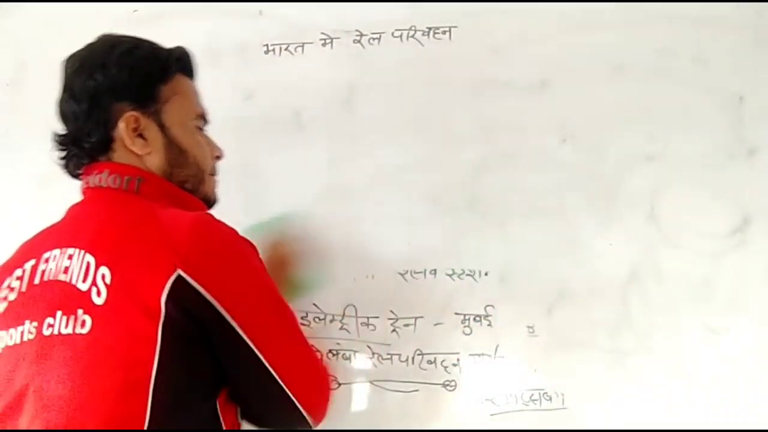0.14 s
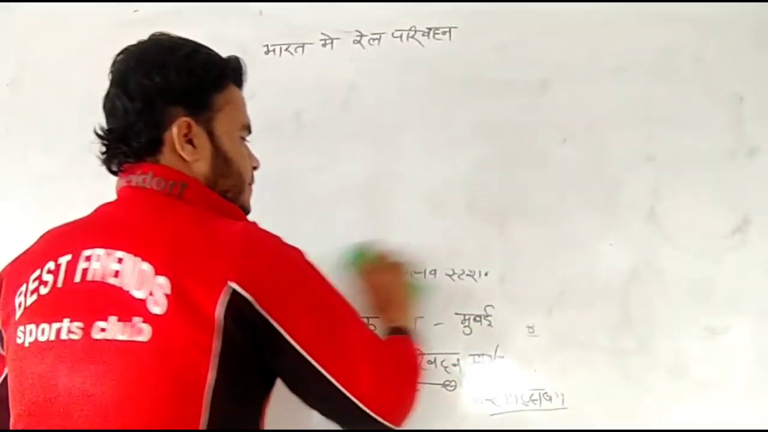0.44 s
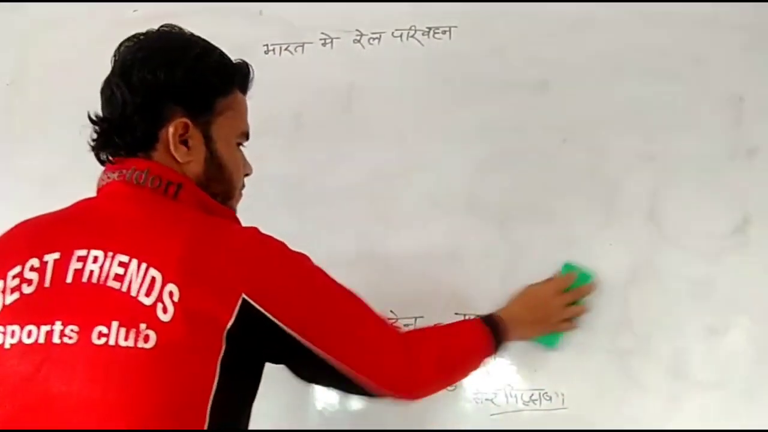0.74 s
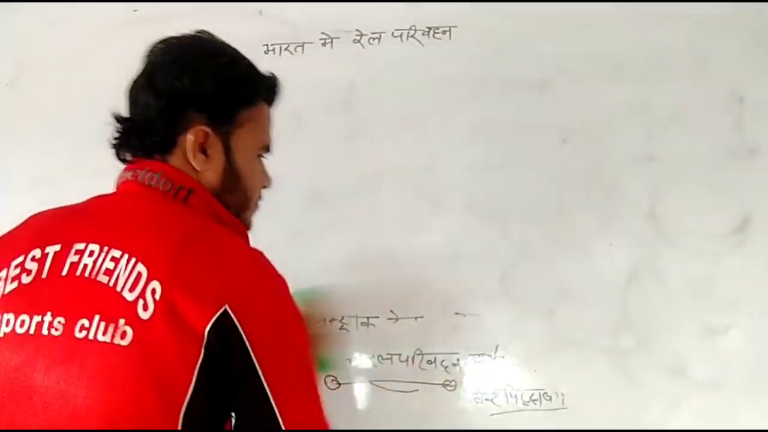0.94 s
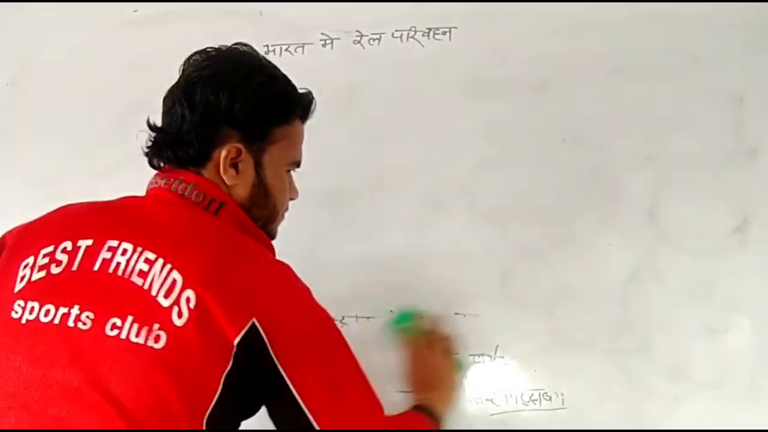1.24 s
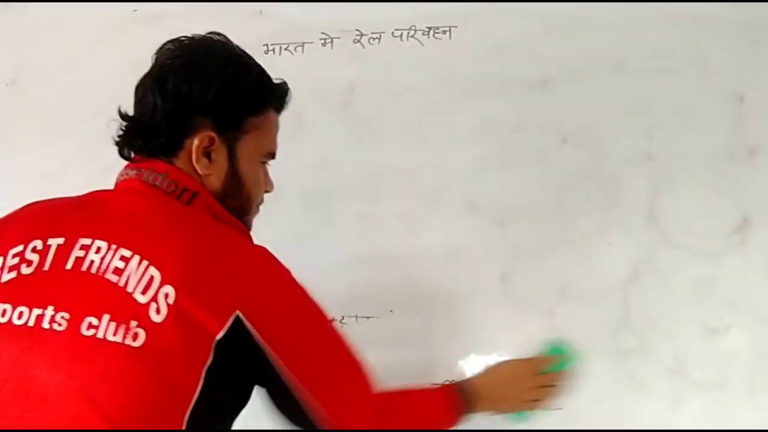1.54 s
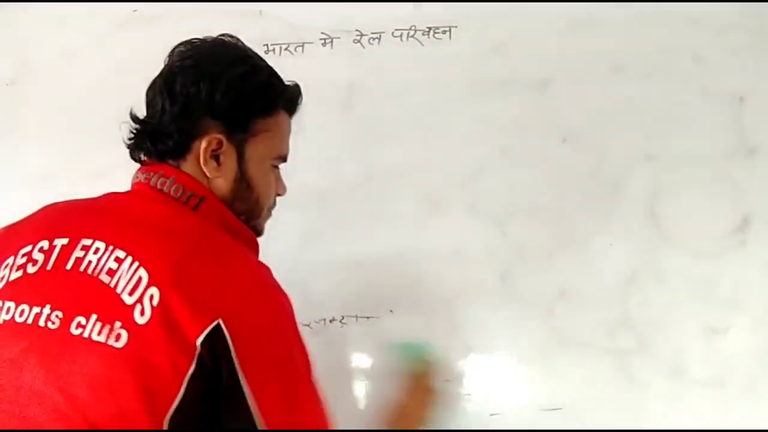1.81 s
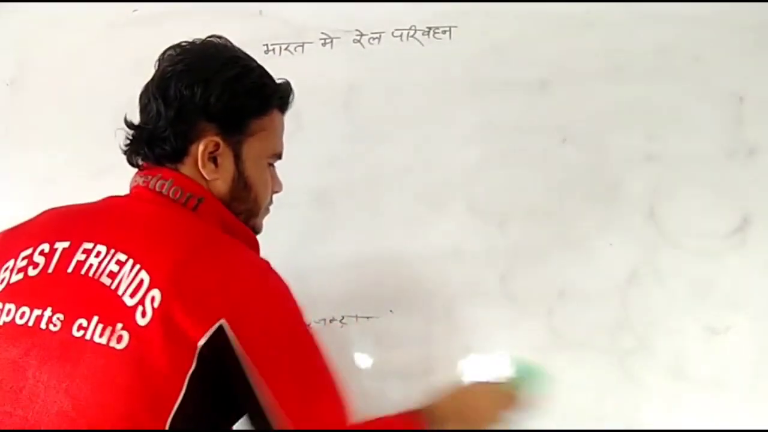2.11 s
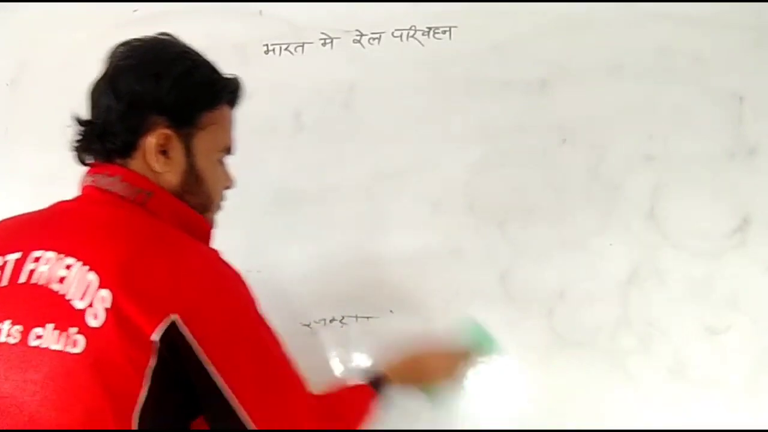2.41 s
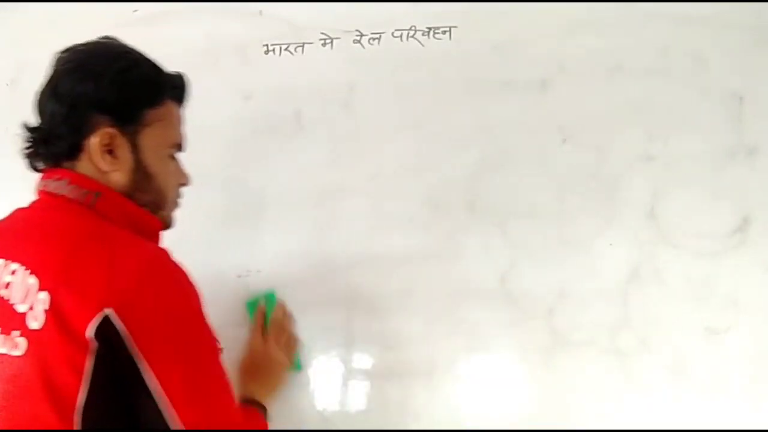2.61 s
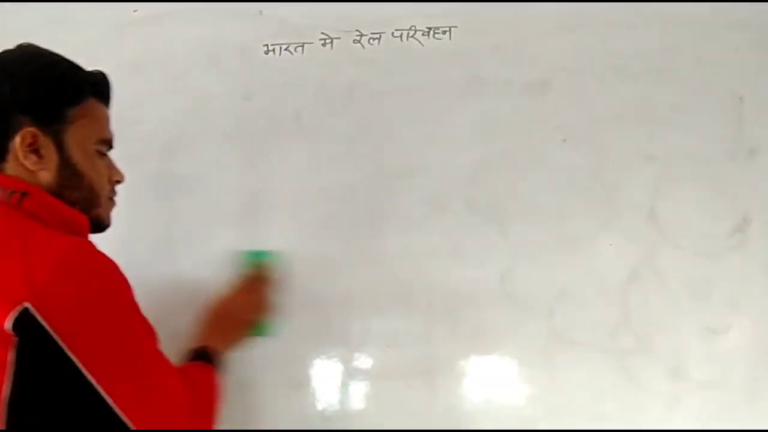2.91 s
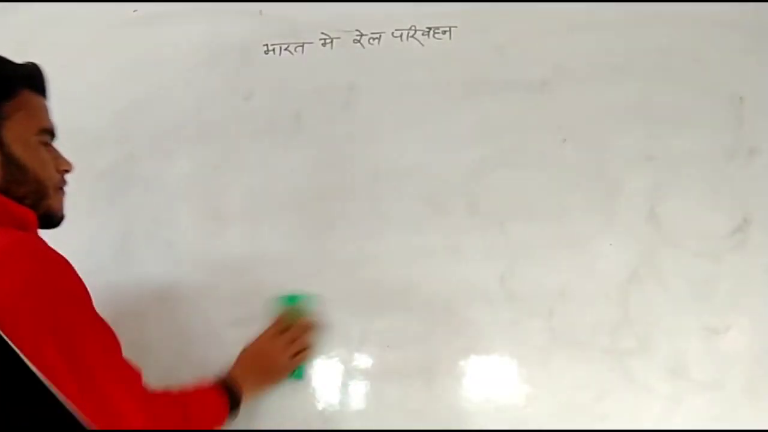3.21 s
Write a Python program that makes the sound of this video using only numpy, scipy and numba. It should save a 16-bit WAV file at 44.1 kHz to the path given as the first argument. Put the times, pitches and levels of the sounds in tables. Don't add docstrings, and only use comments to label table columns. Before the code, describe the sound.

A felt eraser wipes a whiteboard throughout, in fine dry hisses two or three times a second, swelling with hand speed. Hollow board knocks fall near 0.3, 0.4, 0.9, 1.4, 1.9, 2.2 and, strongest, 2.5 seconds, with sharp clicks. Short squeaks come around 1.15, 1.5 and 2.0; a low scuff with a bright scrape near 3.07. Bare-room echo, low hum and soft air rumble, dull phone sound.

```python
import sys
import numpy as np
from scipy import signal
from scipy.fft import rfft, irfft
from scipy.io import wavfile
from scipy.ndimage import uniform_filter1d
from numba import njit

SR = 44100
rng = np.random.default_rng(int(sys.argv[2]) if len(sys.argv) > 2 else 0)


def how_loud(loudness_db):
    steps = np.asarray(loudness_db, float) / 20
    return 10 ** steps


def master(y):
    cut = np.clip(np.atleast_2d(y).T, -1, 1)
    pcm = np.round(cut * 32767)
    wavfile.write(sys.argv[1], SR, pcm.astype(np.int16))


N = 147735
T = np.arange(N) / SR

# (time [s], level [dB])
BUSTLE = [(0, 3), (.15, 3), (.3, 2.5), (.5, 2), (.7, 0), (.84, -1.5), (1.1, 2), (1.3, -1.5), (1.5, -1),
          (1.75, -4), (2, -1.5), (2.3, -2), (2.55, -1), (2.75, -0.5), (2.95, 0), (3.15, -0.5), (3.35, -0.5)]


def unit(x):
    return x / np.sqrt(np.mean(x ** 2))


@njit
def resonator(x, hz, width):
    y, band_state, low_state = np.empty(len(x)), 0., 0.
    for i in range(len(x)):
        g = np.tan(np.pi * hz[i] / SR)
        damping = width / hz[i]
        v = (band_state + g * (x[i] - low_state)) / (1 + g * (g + damping))
        band_state = 2 * v - band_state
        low_state += 2 * g * v
        y[i] = damping * v
    return y


def band(x, hz, width):
    return resonator(x, np.clip(hz, 3, 9000) + np.zeros(len(x)), float(width))


def double_band(x, hz, width):
    return band(band(x, hz, width), hz, width)


def walk(rate):
    hold = int(SR / rate)
    levels = np.repeat(rng.standard_normal(N // hold + 1), hold)
    return 1.3 * uniform_filter1d(uniform_filter1d(levels, hold), hold)[:N]


def colour(x, points):
    hz, db = np.array(points, float).T
    f = np.maximum(np.arange(N // 2 + 1) * SR / N, 1)
    gain = how_loud(np.interp(np.log(f), np.log(hz), db))
    return irfft(rfft(x) * gain * np.minimum(f / hz[0], 1) ** 2, N)


def arch(at, rise, fall):
    phase = np.where(T < at, (T - at) / rise, (T - at) / fall)
    return np.cos(np.pi / 2 * np.clip(phase, -1, 1))


def fade(t, t60):
    return np.exp(-np.log(1000) * t / t60)


def room_bed():
    # (frequency [Hz], density [dB per Hz])
    spectrum = [(45, -5), (122, -11), (300, -15), (750, -21), (1100, -27), (2000, -29), (2700, -34.5),
                (7500, -39)]
    wash = colour(rng.standard_normal(N), spectrum)
    bustle = np.interp(T, *np.array(BUSTLE).T)
    shared = walk(7.69)
    bed = 0
    for hz in 30 * 2 ** np.arange(0, 8.2, .5):
        level = bustle * min(900 / hz, hz / 250, 1)
        level = level + min(700 / hz, 1) * 2.3 * shared
        level = level + min(1500 / hz, 1) * 1.3 * walk(7.1)
        bed = bed + how_loud(level) * band(wash, hz, hz / 3)
    return how_loud(-51.5) * unit(bed)


def hums():
    # (frequency [Hz], width [Hz], level [dB])
    tones = [(34.14, 6.5, -47.5), (65.3, 5.3, -61), (387, 34, -65), (570.5, 90, -70.5), (720, 36, -63.5)]
    # (time [s], level [dB])
    buffet = [(0.0, -49), (0.19, -44), (0.35, -53), (0.37, -46), (1.34, -48.5), (1.39, -45), (2.06, -46.5),
              (2.26, -38), (2.32, -53), (2.58, -42.5), (2.93, -52.5), (3.02, -43.5), (3.32, -58),
              (3.35, -47)]
    bustle = np.interp(T, *np.array(BUSTLE).T)
    thuds = np.interp(T, *np.array(buffet).T) + 47
    out = 0
    for hz, width, db in tones:
        level = db + bustle * min(hz / 250, 1) + 1.7 * walk(3.83)
        if hz < 100:
            level = level + thuds
        out = out + how_loud(level) * unit(band(rng.standard_normal(N), hz, width))
    return out


def draught():
    # (time [s], level [dB])
    gusts = [(0.0, -47.5), (0.34, -21), (0.56, -48), (0.67, -31.5), (0.88, -38.5), (1.03, -25), (1.23, -35),
             (1.96, -36.5), (2.12, -25), (2.2, -44.5), (2.29, -27), (2.39, -52.5), (2.45, -29.5),
             (2.69, -33.5), (2.72, -40), (3.09, -31.5), (3.14, -41), (3.35, -41.5)]
    centre_hz = 8.84
    air = double_band(rng.standard_normal(N), centre_hz, 8.1)
    air = band(air, centre_hz, 25.0)
    return how_loud(np.interp(T, *np.array(gusts).T)) * np.tanh(0.59 * unit(air)) / 0.5


def felt():
    # (time of top speed [s], speeding up [s], slowing [s], level [dB], hiss resonance [Hz])
    strokes = [(0.0, .1, 0.038, -61.5, 4190), (0.241, .14, 0.11, -52.5, 4140),
               (0.439, 0.035, 0.088, -62.5, 4170), (.58, 0.21, 0.12, -54.5, 4040),
               (.73, .1, 0.091, -62.5, 4500), (.91, .04, .06, -67, 4300), (1.038, 0.12, 0.12, -54.5, 4170),
               (1.319, 0.24, 0.22, -57, 3680), (1.5, .08, .06, -66, 4530), (1.66, 0.046, .06, -67.5, 4000),
               (1.789, 0.12, 0.09, -56, 3760), (1.972, 0.096, 0.094, -54.5, 3440),
               (2.279, 0.11, 0.054, -53, 4240), (2.4, 0.052, 0.07, -60, 3900), (2.54, .07, 0.12, -57, 5180),
               (2.638, 0.16, .12, -52.5, 3910), (2.84, 0.11, .08, -59.5, 4180),
               (3.05, 0.15, 0.12, -52.5, 4610), (3.3, 0.096, .1, -59.5, 4130)]
    # (frequency [Hz], density [dB per Hz])
    fibre_spectrum = [(900, -4), (1800, -5.5), (2600, -5.5), (3600, -1), (5500, -2), (7300, -2.5),
                      (8000, -9)]
    grains_per_s, resting_db, speed_power = 16000, -79.5, 0.86
    sag_per_s, resonance_width_hz, resonance_db = .5, 1900, -11

    speed, loud, hz = np.zeros(N), np.full(N, how_loud(resting_db)), np.full(N, 4200.)
    for at, rise, fall, db, stroke_hz in strokes:
        stroke = arch(at, rise, fall)
        hz = np.where(stroke > speed, stroke_hz * (1 - sag_per_s * (T - at)), hz)
        speed = np.maximum(speed, stroke)
        loud = np.hypot(loud, how_loud(db) * stroke ** speed_power)

    chance = grains_per_s / SR * (.3 + 0.77 * speed)
    slips = (rng.random(N) < chance) * rng.standard_normal(N)
    grains = slips * how_loud(1.2 * rng.exponential(size=N)) / np.sqrt(chance)
    hz = uniform_filter1d(hz, size=800) * (1 + .05 * walk(24.6))
    ring = double_band(grains, hz, resonance_width_hz)
    hiss = unit(colour(grains, fibre_spectrum)) + how_loud(resonance_db) * unit(ring)
    return loud * how_loud(.7 * walk(30)) * hiss


def scuffs():
    # (time [s], half length [s], level [dB], frequency [Hz], width [Hz])
    drags = [(0.309, 0.066, -59, 732, 50.4), (0.313, .03, -56, 374, 70), (0.338, 0.019, -58, 1840, 595),
             (0.426, 0.084, -60, 2410, 1380), (0.584, 0.1, -59.5, 4000, 1320),
             (0.717, 0.19, -64, 1670, 800), (0.878, .014, -57.5, 2150, 500), (0.887, 0.027, -49, 117, 60),
             (0.892, 0.028, -52.5, 392, 90), (1.173, 0.012, -58, 4570, 503), (1.284, 0.1, -59, 3840, 900),
             (1.39, 0.089, -62, 3830, 890), (1.362, 0.034, -54, 460, 100), (1.46, 0.11, -64.5, 6680, 1820),
             (1.562, 0.039, -54.5, 390, 160), (1.92, 0.07, -61.5, 3480, 800),
             (2.177, .012, -55.5, 2100, 400), (2.191, 0.026, -48.5, 381, 129),
             (2.419, .05, -58.5, 400, 245), (2.535, 0.073, -64, 1890, 800), (2.546, 0.075, -52, 543, 445),
             (2.584, 0.26, -57, 265, 69.6), (2.566, .04, -62.5, 5400, 350), (3.22, 0.14, -59, 268, 80),
             (1.999, .1, -60, 210, 90), (1.128, 0.067, -58, 380, 150), (2.916, 0.028, -59, 774, 200),
             (3.076, 0.011, -48, 6670, 605), (3.074, 0.028, -44, 205, 111), (3.13, .04, -65, 2460, 407),
             (3.288, .05, -63.5, 4020, 1200), (2.38, 0.05, -64.5, 3880, 1200),
             (.01, 0.022, -58.5, 1090, 497)]
    # (time [s], half length [s], level [dB], frequency [Hz], width [Hz])
    snaps = [
        (.53, .005, -59, 5000, 5000),
        (.872, .005, -49, 5800, 6000),
        (.952, .004, -59, 5000, 4000),
        (1.171, .009, -52, 4600, 5000),
        (2.137, .004, -57, 5500, 6000),
        (2.172, .005, -57, 4200, 4000),
        (2.517, .005, -57, 5500, 4000),
        (2.74, .007, -57, 4500, 3500),
        (2.846, .004, -54, 5800, 4000),
        (2.896, .003, -57, 6000, 5000),
    ]
    # (time [s], half length [s], level [dB], from [Hz], to [Hz])
    squeaks = [
        (1.148, 0.056, -56, 2180, 1740),
        (1.493, 0.11, -61.5, 1450, 2000),
        (2.012, 0.097, -59, 1360, 2050),
    ]
    squeak_width_hz, snap_s = 540, .015

    glides = []
    for at, half, db, start_hz, end_hz in squeaks:
        progress = np.clip((T - at + half) / (2 * half), 0, 1)
        glides.append((at, half, db, start_hz + (end_hz - start_hz) * progress, squeak_width_hz))
    out = 0
    for at, half, db, hz, width in drags + snaps + glides:
        if half < snap_s:
            shape = arch(at - half / 2, .25 * half, 1.7 * half) ** 2
        else:
            shape = arch(at, half, half) ** 2
        rub = shape * double_band(rng.standard_normal(N), hz, width)
        out = out + how_loud(db) * rub * np.sqrt(np.sum(shape ** 2) / np.sum(rub ** 2))
    return out


def knocks():
    # (time [s], panel knock [dB], knock centre [Hz], plastic tick [dB], tick frequency [Hz])
    taps = [(.16, -43, 800, -60, 1200), (.31, -40, 400, -60, 1000), (.398, -39, 620, -58, 1500),
            (.87, -37, 850, -45, 3400), (1.078, -43, 800, -62, 1200), (1.151, -60, 900, -47, 1650),
            (1.379, -40, 650, -58, 1100), (1.539, -48, 800, -62, 1200), (1.919, -37, 660, -58, 1900),
            (.605, -44, 320, -62, 1000), (2.171, -39, 830, -47, 3200), (2.303, -44, 900, -60, 1400),
            (2.323, -38, 880, -46, 1450), (2.438, -46, 600, -60, 1200), (2.508, -33, 450, -58, 2000),
            (2.667, -43, 1300, -50, 2300), (2.738, -47, 1550, -45, 2400), (2.843, -48, 1500, -47, 1600),
            (1.664, -46, 300, -62, 1900), (3.238, -46, 400, -58, 1500)]
    # (frequency [Hz], level [dB], decay time t60 [s])
    modes = [(250, -2, .03), (385, 0, .028), (480, -1, .022), (560, -1, .02), (720, 0, .022), (830, 0, .02),
             (950, -2, .016), (1200, -3, .015), (1500, -1, .016)]
    knock_octaves, contact_s = .6, .0012
    tick_t60_s, crack_s, crack_db = .018, .002, -11

    t = np.arange(9000) / SR
    out = np.zeros(N + len(t))
    for at, knock_db, knock_hz, tick_db, tick_hz in taps:
        knock = 0
        for hz, db, t60 in modes:
            distance = np.log2(hz / knock_hz) / knock_octaves
            level = db + 2 * rng.standard_normal() - 4.8 * distance ** 2
            mode_hz = hz * (1 + .03 * rng.standard_normal())
            knock = knock + how_loud(level) * fade(t, t60) * np.sin(2 * np.pi * mode_hz * t)
        knock = knock * np.minimum(t / contact_s, 1)
        crack = rng.standard_normal(len(t)) * np.exp(-(t / crack_s) ** 2)
        tick = fade(t, tick_t60_s) * np.sin(2 * np.pi * tick_hz * t) * np.minimum(2 * t / contact_s, 1)
        tick = tick + how_loud(crack_db) * crack
        i = int(at * SR)
        out[i:i + len(t)] += how_loud(knock_db) * knock / np.abs(knock).max() + how_loud(tick_db) * tick
    return out[:N]


def wall_echo(board):
    t = T[:SR // 2]
    tail = rng.standard_normal(len(t)) * fade(t, .22) * (t > .004)
    return how_loud(-12) * signal.fftconvolve(board, tail / np.sqrt(np.sum(tail ** 2)))[:N]


def scene():
    room = room_bed() + hums() + draught()
    board = felt() + scuffs() + knocks()
    return (board + wall_echo(board) + room)[None]


def band_limit(x):
    return signal.sosfilt(signal.butter(12, 15450, fs=SR, output="sos"), x)


def record(dry):
    # (frequency [Hz], gain [dB])
    response = [(1, -1), (7400, 0.5), (7700, -1), (8000, -13), (8300, -18), (8600, -41.5), (9000, -74)]
    drift = np.linspace(dry[0, 0], dry[0, -1], N)
    heard = (colour(dry[0] - drift, response) + drift)[None]
    mix = heard + how_loud(-96.5) * rng.standard_normal(dry.shape)
    return band_limit(mix)


dry = scene()
out = record(dry)
master(out)
```